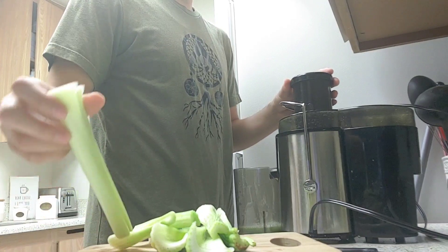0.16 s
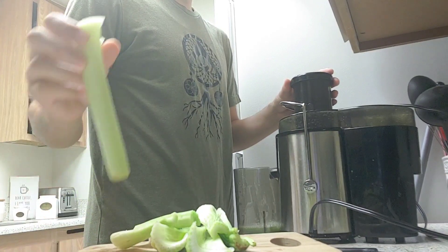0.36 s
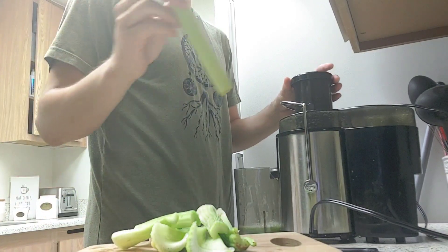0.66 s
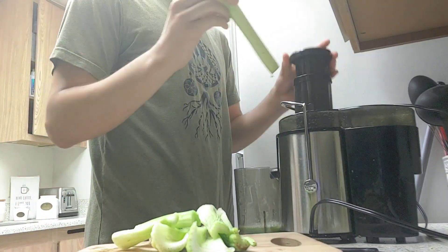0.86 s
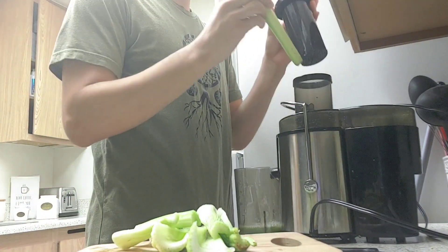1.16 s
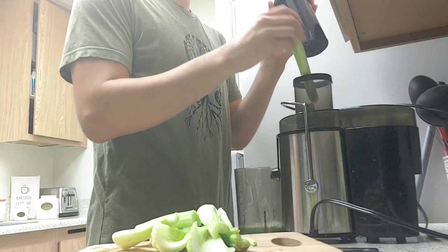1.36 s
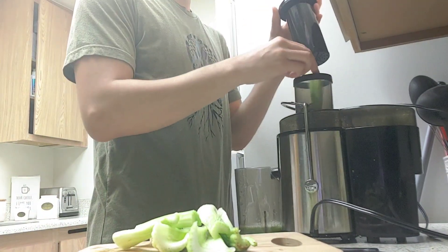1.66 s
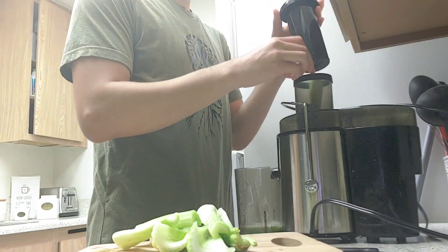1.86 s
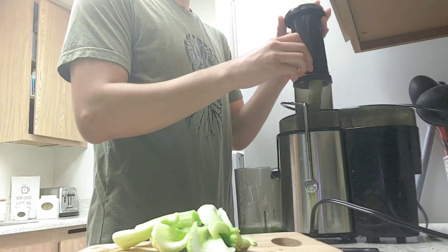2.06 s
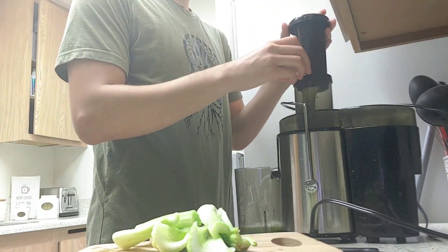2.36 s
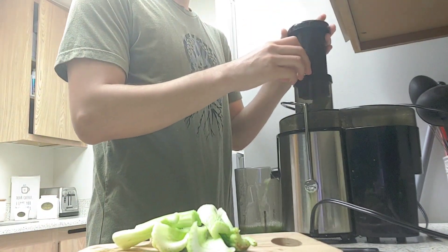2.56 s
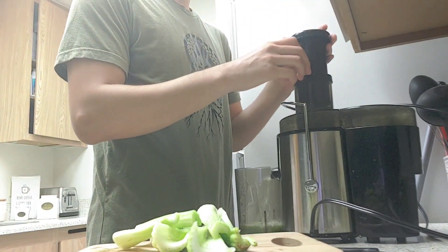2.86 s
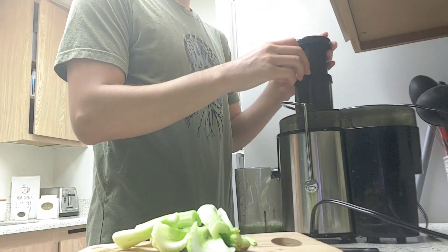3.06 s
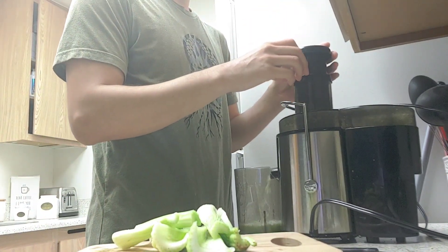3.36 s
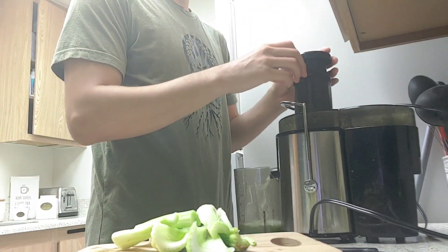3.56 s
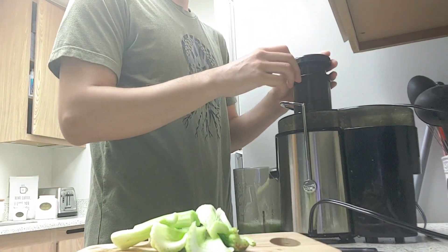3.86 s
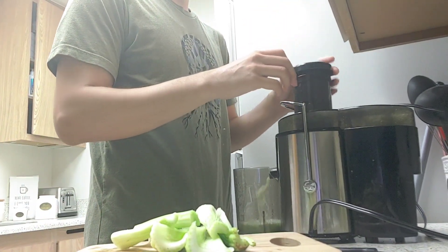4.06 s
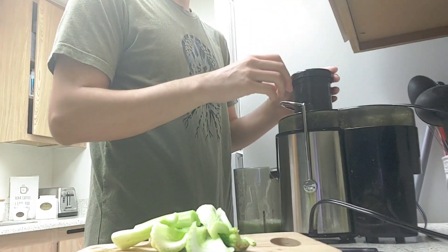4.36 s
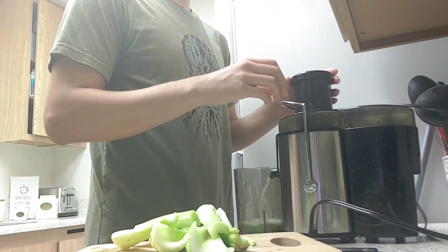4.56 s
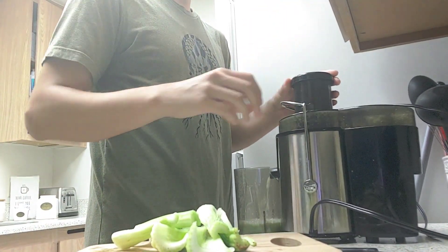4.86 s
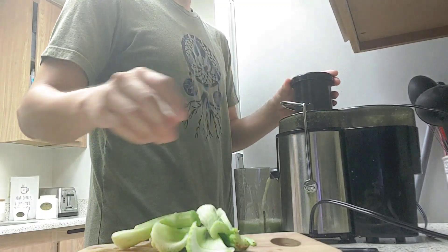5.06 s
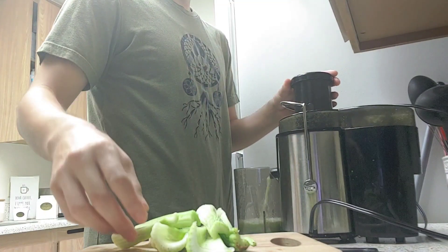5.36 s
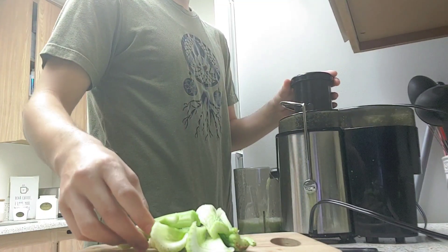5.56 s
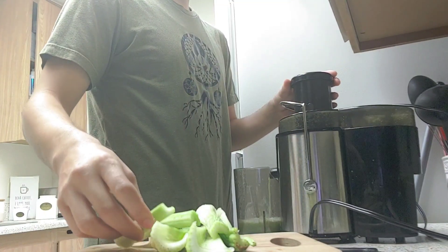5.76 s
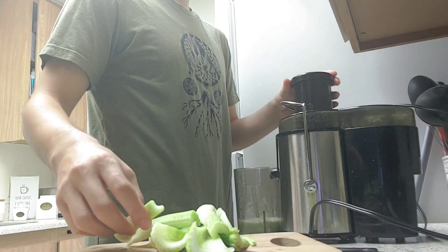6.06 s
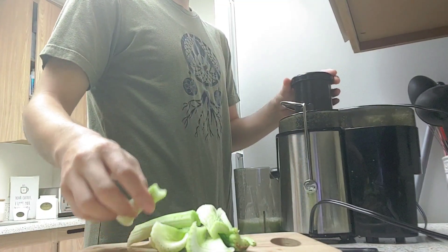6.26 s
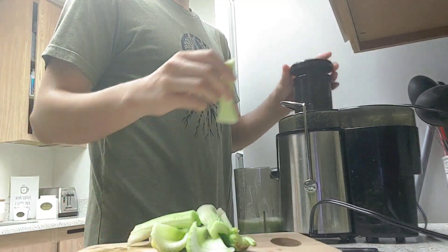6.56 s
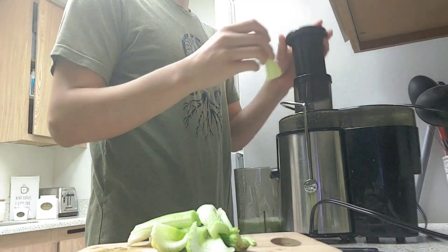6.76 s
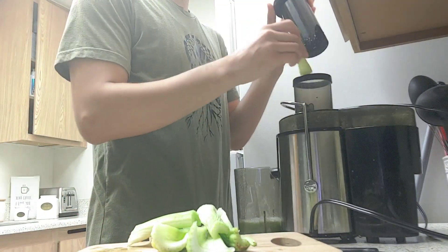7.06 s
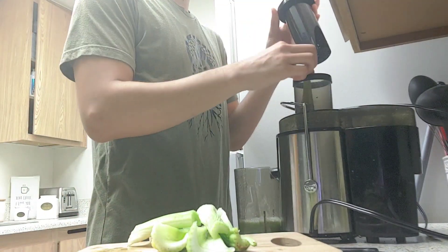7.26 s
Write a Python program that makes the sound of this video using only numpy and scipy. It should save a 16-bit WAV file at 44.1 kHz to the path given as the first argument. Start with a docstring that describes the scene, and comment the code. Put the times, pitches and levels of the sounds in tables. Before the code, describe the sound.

A kitchen juicer hums and roars steadily, then tears a celery stalk in harsh hissing bites as its motor sags and spins back up.

```python
"""On a kitchen counter a centrifugal juicer runs, heard by two small microphone ports with gain control.
The motor hums at shaft speed and whines at its slot rate; shaped noise makes rumble, fan whirr and the air
roaring round the basket. A stalk pushed down the chute is shredded in hissing bites, gated noise with a
swell for each, while the speed sags. Hollow tones and a scuff come from the chute. Motor and air dip briefly
at set times, and the gain control turns everything down while the recent power is high."""
import sys
import numpy as np
from scipy import signal
from scipy.fft import rfft, irfft, next_fast_len
from scipy.io import wavfile
from scipy.ndimage import uniform_filter1d

SR = 44100
rng = np.random.default_rng(int(sys.argv[2]) if len(sys.argv) > 2 else 0)


def dump(signal):
    """Clip the signal to [-1, 1] and save it as 16-bit WAV at the path in sys.argv[1]."""
    limited = np.clip(np.atleast_2d(signal).T, -1, 1)
    pcm = np.round(limited * 32767).astype(np.int16)
    wavfile.write(sys.argv[1], SR, pcm)


N = 327222
TIME = np.arange(N) / SR
LEFT_RIGHT = np.array([[1], [-1]])
FREE_TURNS = 207.6   # free shaft speed, turns per s

# basket and lid resonances: centre_hz, width_hz, lift_db (in the roar; the whine takes 1.9 times as much)
BASKET_MODES = [(4650, 300, 3), (6635, 25, 7), (7315, 40, 3), (7880, 80, 4), (9000, 300, 3)]


def amp(db):
    """dB to gain."""
    return 10 ** (np.asarray(db) / 20)


def rms_one(x):
    """Scale to rms 1."""
    return x / np.sqrt(np.mean(x ** 2) + 1e-20)


def span(start_s, end_s):
    """The samples between two times."""
    return slice(int(start_s * SR), int(end_s * SR))


def in_time(rows):
    """Columns of a curve at every sample."""
    s, *columns = np.transpose(rows)
    return [np.interp(TIME, s, column) for column in columns]


def at_hz(points, hz):
    """Read a spectrum on a log frequency axis."""
    point_hz, point_db = np.array(points).T
    return np.interp(np.log(hz), np.log(point_hz), point_db)


def band_pass(x, order, band_hz):
    """Keep one frequency band."""
    return signal.sosfilt(signal.butter(order, band_hz, "band", fs=SR, output="sos"), x)


def lift_db(modes, hz):
    """Summed lift of some resonances at hz, each a bell round its centre."""
    return sum(lift / (1 + (2 * (hz - centre) / width) ** 2) for centre, width, lift in modes)


def drift(rate_hz):
    """Slow chance movement of spread 1: noise through two equal low-pass poles, run at SR / 40."""
    r = np.exp(-80 * np.pi * rate_hz / SR)
    noise = rng.standard_normal(N // 40 + 2002)
    slow = rms_one(signal.lfilter([1], [1, -2 * r, r * r], noise)[2000:])   # skips the settling
    return np.interp(np.arange(N) / 40, np.arange(len(slow)), slow)


def coloured(spectrum, grain=1.0, modes=(), patchy_db=0.0):
    """Stereo noise of a given spectrum, alike on both sides in the bass; grain gates it, six bands flicker apart."""
    # how alike the two sides are: freq_hz, likeness (1 same, 0 unrelated, -1 opposite)
    likeness = [(30, .94), (80, 1), (180, .99), (260, .95), (400, 0.97), (600, 0.71), (840, 0.6),
                (1070, -0.087), (1360, -0.72), (1730, 0.32), (2300, 0.43), (3000, .12), (6000, .22)]
    port_lag_s, lag_from_hz = .00045, 1800   # the treble reaches the right port later
    size = next_fast_len(N)
    hz = np.arange(size // 2 + 1) * SR / size + 1e-3
    mid, side = rfft(rng.standard_normal((2, N)) * grain, size)
    alike = np.clip(at_hz(likeness, hz), -1, 1)
    both = np.sqrt(1 + alike) * mid + np.sqrt(1 - alike) * side * LEFT_RIGHT
    low, high = spectrum[0][0], spectrum[-1][0]
    both *= amp(at_hz(spectrum, hz) + lift_db(modes, hz)) * (hz > low) * (hz < high)
    both[1] *= np.exp(-2j * np.pi * port_lag_s * np.maximum(hz - lag_from_hz, 0))
    if not patchy_db:
        return rms_one(irfft(both, size)[:, :N])
    # six overlapping triangular bands, evenly spaced in pitch
    place = 5 * np.log(hz / low) / np.log(high / low)
    flickering = 0
    for k in range(6):
        band = irfft(both * np.clip(1 - abs(place - k), 0, 1), size)[:, :N]
        flickering = flickering + amp(patchy_db * drift(9.9)) * band
    return rms_one(flickering)


def shaft_speed():
    """Turns per second: dragged down by the stalk, then an exponential return to free speed."""
    # shaft speed until the stalk is gone: time_s, turns_per_s
    speed = [(0, 201), (.25, 204.2), (.6, 205.9), (1, 207.4), (1.35, 208.1), (1.75, 207.4), (1.95, 202.7),
             (2.25, 188.5), (2.65, 177.1), (3.1, 168.2), (3.35, 162.9), (3.6, 161.5), (3.95, 165.7),
             (4.25, 158.3), (4.6, 160.3), (4.79, 158.6)]
    spin_up_s = 1.0   # time constant
    free_s, last_turns = speed[-1]
    spin_up = FREE_TURNS - (FREE_TURNS - last_turns) * np.exp(-(TIME - free_s) / spin_up_s)
    return np.where(TIME > free_s, spin_up, in_time(speed)[0])


def cutting():
    """1 while the stalk is on the grater, with softened edges."""
    start_s, end_s = 1.8, 4.8
    return uniform_filter1d(1. * (TIME > start_s) * (TIME < end_s), size=4000)


def chute_open():
    """0 with the pusher in, 1 with it out."""
    # pusher out: starts_to_lift_s, back_in_s
    pusher_out = [(.55, 1.76), (6.45, 8.0)]
    lift_s, close_s = 0.59, 0.23
    return sum(np.interp(TIME, [out, out + lift_s, back, back + close_s], [0, 1, 1, 0])
               for out, back in pusher_out)


def bass_dips():
    """Gain of the hum and boom: a sudden drop, held, then a quick return."""
    # brief dips: start_s, depth_db (rumble and air take a smaller share), recovery_s
    dips = [(1.87, 9, .025), (2.15, 9, .04), (2.46, 9, .04), (2.78, 5, .07), (3.27, 10, .02),
            (4.004, 15, .095), (4.685, 14, .04), (4.765, 8, .08)]
    db = np.zeros(N)
    for s, depth_db, recovery_s in dips:
        near = span(s, s + 2 * recovery_s)
        db[near] -= depth_db * np.exp(-((TIME[near] - s) / recovery_s) ** 4)
    return amp(uniform_filter1d(db, size=130))


def air_lull():
    """After the last bite rumble and air stay low, then creep back."""
    start_s, depth_db, back_s = 4.83, 5, 0.16
    shape = (TIME > start_s) * np.exp(-(np.maximum(TIME - start_s, 0) / back_s) ** 2)
    return amp(-depth_db * uniform_filter1d(shape, size=1500))


def motor_hum(turns):
    """Unbalance hums at low orders of the shaft rate, over a steady magnetic hum from the mains."""
    # mean levels before drift: time_s, hum_db (shaft rate), second_db (twice the shaft rate)
    levels = [(0, -28.5, -47), (.95, -26.5, -36), (1.25, -27, -26), (1.4, -24.5, -36.5), (1.8, -27, -37),
              (1.97, -31.5, -47), (2.35, -24.5, -61), (2.72, -26, -39), (2.84, -27.5, -28),
              (3.0, -25.5, -40.5), (3.6, -30, -36), (3.95, -29.5, -39), (4.15, -32, -41), (4.7, -32, -42),
              (5.8, -33.5, -49), (6.6, -29, -49), (7.0, -30.5, -34), (7.42, -28.5, -41.5)]
    # higher orders: multiple of shaft rate, level_db against the second order
    orders = [(3, -13), (4, -11.5)]
    # magnetic hum: freq_hz, level_db before drift
    mains = [(60, -58), (120, -50)]
    hum_db, second_db = in_time(levels)
    skew = .1 * LEFT_RIGHT   # radians; the ports stand a little apart
    angle = 2 * np.pi * np.cumsum(turns) / SR + skew
    hum = amp(hum_db + 1.8 * drift(7.2)) * np.sin(angle)
    hum += amp(second_db + 0.6 * drift(2.1)) * np.sin(2 * angle)
    for k, db in orders:
        hum += amp(second_db + db + 2.0 * drift(1.5)) * np.sin(k * angle)
    for hz, db in mains:
        hum += amp(db + 2.5 * drift(2.5)) * np.sin(2 * np.pi * hz * TIME + skew)
    return np.sqrt(2) * hum   # levels are rms


def slot_whine(turns):
    """Slots whine at twelve a turn and its multiples, loudest where they meet a resonance."""
    # whine level with nothing on the grater: turns_per_s, level_db
    by_speed = [(172, -53), (184, -40), (191, -27.5), (195, -36.5), (199, -31), (203, -37), (206, -41)]
    # partials: multiple of shaft rate, level_db relative to the curve above, left_right_db
    orders = [(12, -3, 0), (36, -18, 3), (48, -17, 5)]
    mute_db = 24   # the stalk on the grater damps the whine
    whine_db = np.interp(turns, *np.transpose(by_speed)) - mute_db * cutting()
    angle = 2 * np.pi * np.cumsum(turns) / SR
    whine = 0
    for k, db, pan_db in orders:
        # room reflections move level and phase on each side
        waver = np.array([drift(4.3) for _ in range(4)])
        level_db = db + 1.9 * lift_db(BASKET_MODES, k * turns) + 1.5 * waver[:2] + pan_db / 2 * LEFT_RIGHT
        whine = whine + amp(level_db) * np.sin(k * angle + 0.14 * k * waver[2:])
    return np.sqrt(2) * amp(whine_db) * whine


def low_rumble(sag, opened):
    """Low noise that weakens as the speed sags; the open chute lifts one band of it."""
    # shape of the rumble: freq_hz, relative density_db (per Hz)
    spectrum = [(50, -46), (90, -32), (130, -9), (215, -7), (250, -15), (310, -2), (357, 2.5), (420, -7),
                (480, -9.5), (600, -15), (700, -10), (840, -11.5), (1000, -29)]
    level_db, db_per_turn = -27, 0.156   # chute closed: at free speed, lost per turn per s of sag
    mouth_hz, mouth_gain = (400, 462), 0.69
    rumble = amp(level_db - db_per_turn * sag + 1.16 * drift(5.8)) * coloured(spectrum, patchy_db=2.0)
    return rumble + mouth_gain * opened * band_pass(rumble, 1, mouth_hz)


def bass_boom(opened):
    """Drifting bass noise that swells while the chute is open."""
    # shape of the boom: freq_hz, relative density_db (per Hz)
    spectrum = [(30, -47), (110, -2), (145, 3.5), (185, -6), (230, -42)]
    closed_db, open_lift_db = -43, 6.5
    return amp(closed_db + open_lift_db * opened + 3.5 * drift(5.6)) * coloured(spectrum)


def air_roar(sag, opened):
    """Air roars round the basket, coloured by its resonances and weaker as the speed sags."""
    # shape of the roar: freq_hz, relative density_db (per Hz)
    spectrum = [(700, -19), (1000, -9), (1300, 0.5), (1500, -4.5), (1850, -10.5), (2600, -4), (3600, -7.5),
                (4500, -6), (6500, -9), (10000, -12.5), (13000, -18.5), (15900, -24.5)]
    level_db, db_per_turn = -25, 0.0725   # chute closed: at free speed, lost per turn per s of sag
    open_lift_db = 1.5
    level = amp(level_db - db_per_turn * sag + open_lift_db * opened)
    return level * coloured(spectrum, modes=BASKET_MODES, patchy_db=1.05)


def fan_whirr(sag, opened):
    """The cooling fan breathes a narrow noise band, ringing in its housing."""
    # shape of the whirr: freq_hz, relative density_db (per Hz)
    spectrum = [(1950, 10.5), (2150, 9), (2330, 6.5), (2550, -4), (2800, -6)]
    # fan housing resonances: centre_hz, width_hz, lift_db
    housing = [(2156, 30, 7.5), (2258, 33, 6.5), (2278, 27, 7.5), (2640, 90, 16)]
    level_db, db_per_turn = -35, 0.2   # chute closed: at free speed, lost per turn per s of sag
    open_lift_db, pan_db = 2.5, -0.5   # pan is left over right
    level = amp(level_db - db_per_turn * sag + open_lift_db * opened)
    whirr = level * coloured(spectrum, modes=housing, patchy_db=3.5)
    return whirr * amp(pan_db / 2 * LEFT_RIGHT)


def counter_shudder(opened):
    """Deep noise: the counter shakes, most while the stalk is cut or hands work at the open chute."""
    spectrum = [(18, -10), (40, -10), (75, 3)]   # freq_hz, relative density_db (per Hz)
    level_db = -52.5   # at full activity
    activity = np.maximum(cutting(), opened).clip(.3)
    return amp(level_db + 2.7 * drift(1.1)) * activity * coloured(spectrum)


def shredding(sag):
    """Teeth tear fibres in dense snaps: a spray of changing level plus bites that set in fast, hold and fade."""
    # pulp and juice thrown against the basket: time_s, spray_db before the treble shaping
    feed = [(1.6, -32), (1.9, -31), (2.3, -27.5), (2.6, -28), (2.9, -26), (3.4, -29.5), (3.9, -32.5),
            (4.09, -42), (4.2, -36), (4.6, -48), (4.78, -54)]
    # bites of the grater into the stalk: start_s, level_db before the treble shaping, length_s
    bites = [(1.613, -23.5, 0.022), (1.653, -25, 0.017), (1.841, -22.5, 0.069), (1.957, -19.5, 0.045),
             (2.018, -25, 0.016), (2.063, -22.5, 0.033), (2.102, -20, 0.08), (2.202, -27, 0.017),
             (2.233, -18.5, 0.013), (2.395, -23.5, 0.06), (2.451, -19.5, 0.031), (2.692, -30, 0.026),
             (2.742, -21.5, .04), (2.88, -21, 0.026), (2.958, -17.5, 0.039), (3.021, -17, 0.0087),
             (3.067, -20, 0.0079), (3.098, -19, 0.0093), (3.138, -24, 0.0069), (3.177, -22, 0.082),
             (3.26, -14.5, .01), (3.282, -18.5, 0.018), (3.336, -20, 0.018), (3.389, -29, 0.029),
             (3.44, -26, 0.061), (3.526, -22, 0.013), (3.552, -18.5, .008), (3.618, -22, 0.016),
             (3.673, -18, 0.0086), (3.965, -22, 0.03), (3.99, -18.5, .045), (4.123, -23, 0.017),
             (4.143, -26.5, 0.048), (4.279, -20.5, 0.026), (4.351, -22.5, 0.0037), (4.512, -22, 0.019),
             (4.632, -22, .01), (4.65, -20, 0.034), (4.689, -22.5, 0.015), (4.713, -22, 0.02),
             (4.739, -20, 0.0099)]
    # shape of the tearing noise: freq_hz, relative density_db (per Hz)
    spectrum = [(1200, -90), (2500, -5.5), (4000, -3), (6000, -3), (9000, -1), (12000, 1), (15900, -8.5)]
    rise_s, fall_s, swell = .001, .014, .2   # edges, both longer by this share of the length
    spray = amp(2 * in_time(feed)[0])   # as power
    power = spray.copy()
    for s, db, length in bites:
        corners = s + np.array([0, rise_s + swell * length, rise_s + length, fall_s + (1 + swell) * length])
        near = span(s, corners[-1])
        power[near] += (amp(db) * np.interp(TIME[near], corners, [0.29, 1, 0.87, 0.062])) ** 2

    snaps_per_s = 12000
    snap_strength = amp(1.9 * np.minimum(rng.exponential(1, N), 4))
    snaps = snap_strength * (rng.random(N) < snaps_per_s / SR)
    tearing = coloured(spectrum, snaps, patchy_db=1.2)

    # slower teeth lose a share of the top for each turn per s of sag
    dull_hz, dull_per_turn, top_gain = 10600, 0.005, 1.2
    # the top comes mostly from the spray and takes only this share of a bite's swell
    top_follows = .55
    below = signal.sosfiltfilt(signal.butter(4, dull_hz, fs=SR, output="sos"), tearing)
    top = top_gain * (1 - np.clip(dull_per_turn * sag, 0, 1))
    top = top * (spray / power) ** ((1 - top_follows) / 2)

    # fast teeth make the basket sing, until the speed sags by sing_sag turns per s
    sing_hz, sing_gain, sing_sag = (7100, 8000), .6, 35
    sing = signal.sosfiltfilt(signal.butter(2, sing_hz, "band", fs=SR, output="sos"), tearing)
    tearing = below + (tearing - below) * top + sing_gain * np.clip(1 - sag / sing_sag, 0, 1) * sing

    chatter = amp(1.5 * drift(60))   # the stalk jumps on the teeth
    lean = amp(-.7 * LEFT_RIGHT)     # the chute is nearer the right port
    return np.sqrt(power) * chatter * lean * tearing


def chute_knocks():
    """Short hollow swells at the pitch of the air column, blown unevenly as pusher and stalk move."""
    # tones of the chute: start_s, peak_db before the gusts, mean pitch_hz, length_s
    column = [(1.908, -25, 133.6, 0.04), (1.981, -27.5, 529, 0.23), (2.058, -27, 121, 0.037),
              (3.045, -35, 527, 0.24), (3.852, -30, 353, 0.075), (3.922, -28.5, 570, 0.11),
              (3.963, -29, 425, 0.068), (4.12, -33, 341, 0.057), (4.18, -33, 430, 0.07),
              (6.798, -19, 355, 0.072), (6.946, -23, 390, 0.053), (7.312, -24.5, 132.8, 0.061)]
    out = np.zeros(N)
    wobble_s = 0.07 * np.cumsum(drift(40)) / SR   # pitch wanders with a spread of 7 %
    gusts = amp(3.0 * drift(60))
    for s, db, hz, length in column:
        near = span(s, s + length)
        swell = np.sin(np.pi * (TIME[near] - s) / length) ** 2
        out[near] += amp(db) * swell * np.sin(2 * np.pi * hz * (TIME[near] + wobble_s[near]))
    return out * gusts


def pusher_scuff():
    """One short dull rub of plastic on plastic as the pusher scuffs the chute."""
    centre_s, level_db, half_s, band_hz = 4.066, -30, .016, (950, 1850)
    rub = band_pass(rng.standard_normal((2, N)), 2, band_hz)
    return amp(level_db) * np.exp(-((TIME - centre_s) / half_s) ** 2) * rms_one(rub)


def kitchen(x):
    """Tiles and cupboards throw the treble back: a short dying tail, another on each side."""
    level_db, t60_s, from_hz = -13, 0.15, 1330
    s = np.arange(SR // 8) / SR
    tail = rng.standard_normal((2, len(s))) * amp(-60 * s / t60_s) * (s > .002)
    tail = signal.sosfilt(signal.butter(2, from_hz, "high", fs=SR, output="sos"), tail)
    tail /= np.sqrt(np.sum(tail ** 2, axis=1, keepdims=True))
    return x + amp(level_db) * signal.fftconvolve(x, tail, axes=1)[:, :N]


def gain_control(x):
    """Turns both sides down by how far the recent mean power lies over the threshold."""
    threshold_db, cut_per_db, memory_s = -18, 1.23, .27
    power = np.mean(x ** 2, axis=0)
    r = np.exp(-1 / (memory_s * SR))
    recent, _ = signal.lfilter([1 - r], [1, -r], power, zi=[power[:SR // 4].mean()])
    over_db = np.maximum(10 * np.log10(recent) - threshold_db, 0)
    return x * amp(-cut_per_db * over_db)


def scene():
    """Motor, air, stalk and chute; the treble sources also sound in the room."""
    turns = shaft_speed()
    sag = FREE_TURNS - turns
    opened, dips, lull = chute_open(), bass_dips(), air_lull()
    bass = (motor_hum(turns) + bass_boom(opened)) * dips
    rumble = low_rumble(sag, opened) * dips ** 0.5 * lull
    air = (fan_whirr(sag, opened) + air_roar(sag, opened)) * dips ** 0.4 * lull
    in_room = kitchen(slot_whine(turns) + air + shredding(sag))
    return bass + rumble + counter_shudder(opened) + chute_knocks() + pusher_scuff() + in_room


def record(dry):
    """Each port has a bright cavity resonance; the gain follows the level, peaks are rounded and the top is cut."""
    # left, then right port: resonance_hz, width_hz, lift_db, gain_db
    ports = [(7934, 857, 19, -3.5), (8170, 680, 17, -3.5)]
    cutoff_hz, ceiling = 15830, .62
    heard = []
    for side, (hz, width_hz, peak_db, gain_db) in zip(dry, ports):
        r = np.exp(-np.pi * width_hz / SR)
        b = (1 - r * r) / 2
        peak = signal.lfilter([b, 0, -b], [1, -2 * r * np.cos(2 * np.pi * hz / SR), r * r], side)
        heard.append(amp(gain_db) * (side + (amp(peak_db) - 1) * peak))
    rounded = ceiling * np.tanh(gain_control(np.array(heard)) / ceiling)
    return signal.sosfilt(signal.cheby2(20, 70, cutoff_hz, fs=SR, output="sos"), rounded)


dry = scene()
out = record(dry)
dump(out)
```